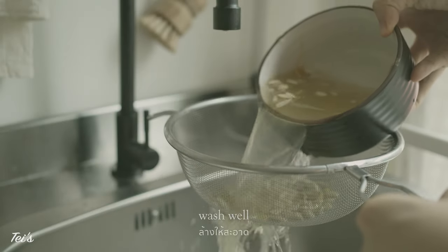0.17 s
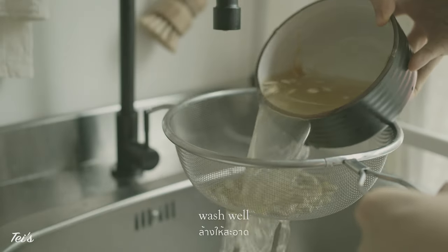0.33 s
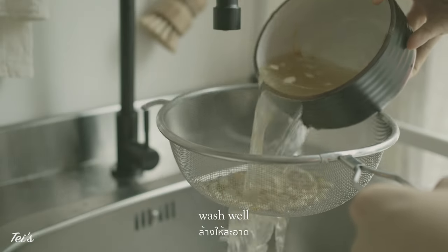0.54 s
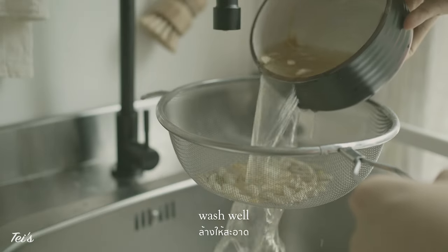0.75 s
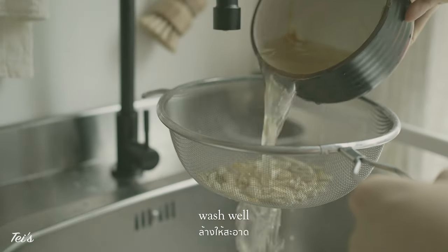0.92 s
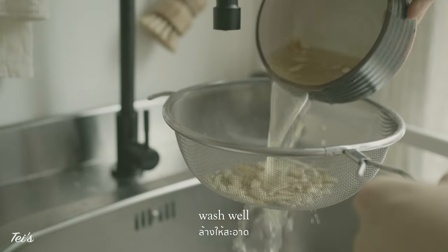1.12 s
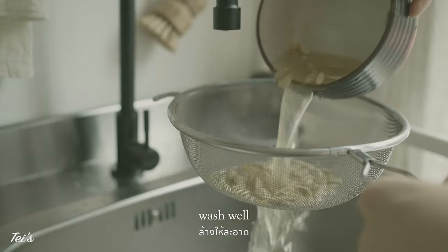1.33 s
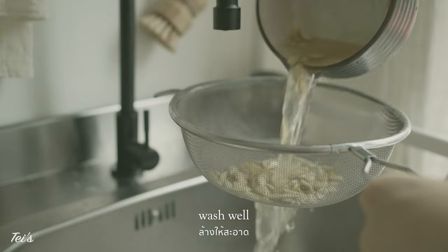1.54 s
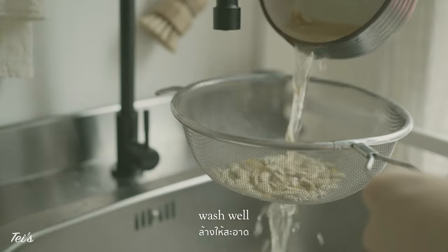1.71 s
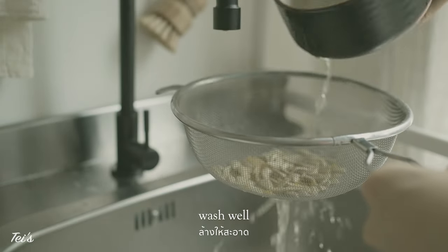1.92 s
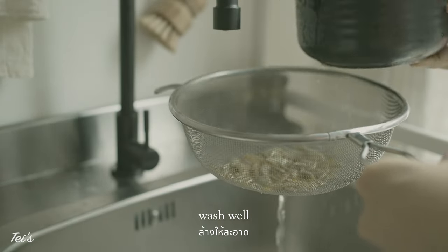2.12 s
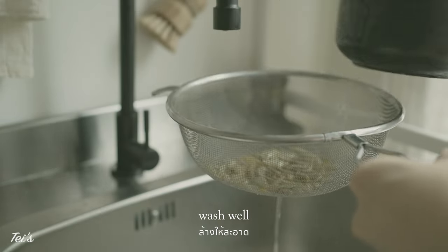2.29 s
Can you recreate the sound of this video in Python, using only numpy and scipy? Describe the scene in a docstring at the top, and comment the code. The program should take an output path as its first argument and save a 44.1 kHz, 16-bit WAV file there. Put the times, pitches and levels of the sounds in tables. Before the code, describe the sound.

Water pours through a mesh strainer into a steel sink, heard close in a small kitchen. Until about 0.8 s a dense, bubbly stream drums softly on the ringing steel. From 0.8 to 1.6 s it breaks into crackling spatters, dull slaps and bright bubble plips. It thins, with a hollow slap near 1.8 s and a plip cluster near 1.9, then sparse high drips until 2.3 s.

```python
"""Pouring water into a steel sink

Water is poured from a bowl through a mesh strainer into a steel kitchen sink. The full stream drums on
the steel (filtered random hits) and churns up bubbles (rising sine pings) and spray (droplet ticks).
As it thins it breaks into slaps, splashes (bursts of ticks) and loud single bubbles, and ends in drips.
The sink floor rings through resonators; dying noise echoes stand for the basin and a small kitchen."""
import sys
import numpy as np
from scipy import signal
from scipy.fft import rfft, irfft
from scipy.io import wavfile

SR = 44100
rng = np.random.default_rng(int(sys.argv[2]) if len(sys.argv) > 2 else 0)


def transcribe(signal):
    """Save signal, clipped to [-1, 1], as a 16-bit WAV file at the path in sys.argv[1]."""
    frames = np.atleast_2d(signal).T
    limited = np.clip(frames, -1, 1)
    pcm = np.round(limited * 32767).astype(np.int16)
    wavfile.write(sys.argv[1], SR, pcm)


N = 103987
TIME = np.arange(N) / SR

# The stream's bubbling and spray, before the colouring by size:
# (time [s], level of large bubbles [dB], level of small bubbles [dB], level of spray [dB])
CHURN_LEVELS = [(0,-30.5,-35.5,-42.5),(.18,-28,-33,-38),(.31,-31,-34.5,-39.5),(.39,-35,-41,-46),(.46,-38,-29,-38),(.54,-32.5,-31,-41),(.68,-33.5,-31,-40.5),(.76,-24,-35,-38.5),(.84,-35,-31,-36.5),(1.07,-30,-36,-36.5),(1.2,-36,-41,-43.5),(1.29,-25,-40,-48.5),(1.33,-29.5,-40.5,-42.5),(1.41,-34,-29,-31.5),(1.48,-42.5,-42,-49),(1.56,-30.5,-29,-45),(1.63,-30.5,-38.5,-48),(1.72,-33.5,-34.5,-44),(1.83,-34.5,-42.5,-71),(1.89,-22.5,-54,-90),(1.99,-43,-109.5,-98),(2.35,-100,-48,-87)]
# How strong each bubble size is: (pitch [Hz], level per pitch class [dB])
BUBBLE_SPECTRUM = [(800,-19),(1200,-12),(1650,-2.5),(2000,-8.5),(2600,-2.5),(4000,-1.5),(5500,-2),(7000,0.5),(10000,-8),(14500,-7)]
# The largest bubbles shrink as the stream thins: (time [s], lowest pitch [Hz])
LOWEST_PITCH = [(0, 750), (.85, 1040), (1.25, 1480), (2.3, 1880)]
# Tone of the droplet ticks: (frequency [Hz], relative level [dB])
SPRAY_SPECTRUM = [(500,-43.5),(1200,-35.5),(1900,-41),(5000,14),(12500,10),(16000,-48.5)]
# Loud single bubbles: (time [s], level [dB], pitch [Hz], cycles to the peak [count], left over right [dB])
LOUD_BUBBLES = [(.0005,-11.5,1465,3.75,-0.5),(0.195,-24,1470,8.2,-9),(0.355,-17,4270,4.5,-8),
                (0.5216,-12.5,3640,4.6,-1),(0.612,-10.5,2180,1.6,-5),(0.668,-16.5,2960,4.9,-10),(0.7196,-13.5,1653,5.2,-10),
                (0.895,-9.5,4850,3,-3),(1.026,-18,4100,3,12),(1.084,-11,3250,2.2,9),
                (1.1041,-13,4010,3.7,-2),(1.133,-17,4280,2.8,2),(1.137,-10.5,3670,2.5,4),(1.2467,-16.5,2750,3.1,-3),(1.3,-15.5,4350,1.9,4),
                (1.4393,-10.5,3680,2,0),(1.5127,-9,3490,2,2),
                (1.5357,-12.5,5870,4,-2),(1.5512,-15.5,2530,4,-6),(1.5938,-12,2210,3.3,-2),(1.633,-37.5,1130,6.6,-13),(1.66,-46,1060,5.6,-8.5),(1.6628,-21.5,3010,3.8,8.5),
                (1.869,-14,4550,2.4,5),(1.8825,-21.5,2160,10,-2),(1.9373,-23,2364,5.3,4),(1.958,-22.5,2210,5.5,1),
                (2.0377,-21.5,6500,4.2,-6),(2.0479,-18,5420,3,4),(2.167,-34,2066,13,-8),
                (2.209,-18.5,3190,3.8,-15.5),(2.2181,-26.5,2937,11.3,14),(2.22,-40,2980,53,-5.5),(2.2894,-21.5,3450,1.2,-3)]
# Bursts of droplets: (start [s], level [dB], time to the peak [s], centre [Hz])
SPLASH_BURSTS = [(0.074,-21,0.0044,3040),(0.133,-21.5,0.0089,2870),(0.297,-22,0.0044,4440),(.492,-17,0.0017,2870),(0.551,-18,0.0028,3480),(0.829,-24.5,0.0049,5970),(.878,-23.5,.003,5800),(0.963,-20.5,0.0034,4600),(1,-40,0.001,6500),(1.025,-17,0.0019,3570),(1.036,-16.5,0.0029,4500),
                 (1.261,-25.5,0.0053,7730),(1.301,-15.5,0.0013,7000),(1.356,-17.5,.002,7000),(1.376,-21,0.0015,7650),(1.398,-43,0.0039,5000),(1.416,-17,0.0018,6500),(1.494,-21.5,0.0049,8000),(1.593,-26.5,.004,2560),(1.601,-31.5,0.002,9000),(1.756,-33,0.0016,7900),(1.769,-28,0.0046,8250),(1.8476,-20,0.0016,6670),(1.865,-19.5,0.0017,4800),(1.95,-33.5,0.0045,12400),
                 (2.006,-37,0.006,9450),(2.027,-29.5,0.0033,9000),(2.046,-24.5,0.0013,5760),(2.102,-44,0.0013,9300),(2.111,-34,0.0016,6600),(2.177,-45.5,0.0065,8300),(2.2235,-30.5,0.0007,7220),(2.288,-27,0.0017,5200)]
# The unbroken stream drums on the steel: (time [s], level [dB])
DRUMMING_LEVEL = [(0,-42.5),(.15,-37.5),(.36,-37),(.48,-40.5),(.62,-37),(.73,-41),(.8,-47),(.9,-82)]
# Tone of hits on the steel: (frequency [Hz], relative level [dB])
DRUM_SPECTRUM = [(60,-42),(95,-29),(130,-12.5),(195,-18),(240,0.5),(480,-0.5),(690,0),(800,-4.5),(1200,-1),(1700,-17)]
# Gouts of water slap the steel: (start [s], level [dB], time to the peak [s], centre [Hz])
STEEL_SLAPS = [(0.828,-41.5,0.028,623),(0.96,-31.5,0.025,770),(1.0,-40.5,0.074,545.4),(1.106,-31,0.021,308),(1.212,-34.5,0.021,536),(1.346,-37,0.032,546),(1.374,-39,0.016,314),(1.411,-42.5,0.011,547),
               (1.503,-52,0.011,636),(1.563,-51.5,0.016,687),(1.648,-53.5,0.029,756),(1.769,-27.5,0.011,496),(1.838,-36.5,0.014,456),(1.952,-44.5,0.018,657),(2.006,-37.5,0.021,657.4),(2.056,-39.5,0.031,539),(2.088,-42.5,0.014,351)]
# The whole floor gives under a gout: (frequency [Hz], relative level [dB])
HEAVE_SPECTRUM = [(50,-29),(160,2),(400,-16)]
# The sink floor rings: (frequency [Hz], level [dB])
FLOOR_MODES = [(238,2),(288,3),(466,-3),(690,-1.5)]

# Bubbles
LARGE_HZ, SMALL_HZ, SPRAY_HZ = 1860, 4230, 8700  # pitches where each CHURN_LEVELS column rules alone
START_BUBBLES_PER_S, THINNING_S = 11000, 2
BUBBLES_DB, RISE_CYCLES, SIZE_SPREAD_DB = -0.5, 3.22, 2.2
PITCH_RISE = .012  # half the share by which the pitch rises per rise time
PATCHY_DB, PATCHES_PER_S = -1.5, 33  # bubbles of one size come in brief runs
BIRTH_SPLASH_DB = -2  # the splash that traps a loud bubble, for a bubble of one cycle
SHORTEST_RISE_S = .0008
WATER_LOW_CUT_HZ = 650
# Droplets
CLUMPS_PER_S, CLUMP_RISE_S, CLUMP_DEPTH = 120, 0.0019, 0.87
CLUMP_BUBBLE_SHARE = 0.34  # how far bubbles follow the showers, as a power
SPRAY_DB, TICKS_PER_S, TICK_SPREAD_DB = 3, 3300, 4
SPLASH_TICKS_PER_S, SPLASH_SPREAD_DB = 6000, 3.2
SPLASH_OCTAVES = 0.5  # to each side
PAN_SPREAD_DB, EAR_LAG_S = 4, .00007  # random spread between left and right
# Steel
SLAP_HITS_PER_S, SLAP_OCTAVES = 2200, 0.41  # octaves to each side
SLAP_SKIRT_DB, SKIRT_OCTAVES = -4.5, 0.86  # a wider, softer band around each slap
GULP_DB, SLAP_RING_DB, HEAVE_DB = -3, -5, -19.5
SINK_T60_S = .13  # time for the ringing to fall by 60 dB
# Echoes and air
BASIN_DB, BASIN_T60_S = -7, .04
ROOM_DB, ROOM_T60_S, FIRST_ECHO_S = -6, 0.14, 0.0022
LOW_ROOM_DB, STEEL_SIDE_DB, WIDE_ABOVE_HZ = -8, -3.5, 585
AIR_DB, CUTOFF_HZ = -99, 16200


def from_db(db):
    """Turn decibels into a gain."""
    return 10 ** (np.asarray(db) / 20)


def rms_one(x):
    """Scale to unit power."""
    return x / np.sqrt(np.mean(x ** 2) + 1e-20)


def in_time(rows):
    """Read each column of a table at every sample, on straight lines between its points."""
    s, *columns = np.transpose(rows)
    return [np.interp(TIME, s, column) for column in columns]


def at_hz(points, hz):
    """Read a spectrum on a log-frequency axis, where equal steps are equal musical intervals."""
    f, db = np.transpose(points)
    return np.interp(np.log(hz + 1e-9), np.log(f), db)


def coloured(x, points):
    """Shape a signal by a spectrum, then set it to unit power."""
    hz = np.arange(N + 1) * SR / (2 * N)
    shaped = rfft(x, 2 * N) * from_db(at_hz(points, hz))
    return rms_one(irfft(shaped)[..., :N])


def highpass(x, order, hz):
    """Take away the sound below a frequency."""
    return signal.sosfilt(signal.butter(order, hz, "high", fs=SR, output="sos"), x)


def band(x, hz, octaves):
    """Keep a steep band reaching some octaves to each side of a centre."""
    edges = [min(hz / 2 ** octaves, SR / 3), min(hz * 2 ** octaves, .45 * SR)]
    return signal.sosfilt(signal.butter(3, edges, "band", fs=SR, output="sos"), x + 1e-18)


def swell(u):
    """Rounded attack peaking at u = 1, then a decay."""
    u = np.maximum(u, 0)
    return (u * np.exp(1 - u)) ** 2


def panned(db):
    """Left and right gains for a level difference."""
    return from_db(np.array([db, -db]) / 2)


def air():
    """The kitchen's quiet air: very faint noise, weaker toward the treble."""
    noise = rng.standard_normal((2, N))
    return from_db(AIR_DB) * coloured(noise, [(40, -6.5), (10000, -15.5)])


def echoes(x, t60):
    """Dense dying reflections: fading noise, different at each ear and drawn anew at each call."""
    t = TIME[:SR // 4]
    response = rng.standard_normal((2, len(t))) * from_db(-60 * t / t60) * (t > FIRST_ECHO_S)
    response = response / np.linalg.norm(response, axis=1, keepdims=True)
    return signal.fftconvolve(x, response, axes=1)[:, :x.shape[1]]


def in_sink(x):
    """Direct sound, the basin's close reflections, and the kitchen's longer ones."""
    both = np.tile(x.sum(0) / np.sqrt(2), (2, 1))
    basin = from_db(BASIN_DB) * echoes(x, BASIN_T60_S)
    return x + basin + from_db(ROOM_DB) * echoes(both, ROOM_T60_S)


def impacts(per_s, spread_db):
    """Random stereo clicks, each with its own size and place; steady power at any rate."""
    at = np.flatnonzero(rng.random(N) < per_s / SR)
    size = rng.exponential(1, N)[at]
    sign = rng.choice([-1, 1], N)[at]
    pan = rng.standard_normal(N)[at]
    lag = rng.standard_normal(N)[at]
    rate = (per_s + 0 * TIME)[at]
    strength = sign * from_db(spread_db * np.minimum(size, 3)) / np.sqrt(rate)
    left, right = strength * panned(PAN_SPREAD_DB * pan)
    out = np.zeros((2, N))
    out[0, at] = left
    right_at = at + np.round(lag * EAR_LAG_S * SR).astype(int)
    out[1, np.clip(right_at, 0, N - 1)] = right
    return rms_one(out)


def chirp(u, cycles):
    """A bubble's tone creeps upward as it nears the surface; u counts rise times."""
    return np.sin(2 * np.pi * cycles * u * (1 + PITCH_RISE * u))


def floor_ringing(push):
    """The sink floor rings at its own pitches when pushed: one resonator for each."""
    r = from_db(-60 / (SINK_T60_S * SR))  # how much is left after one sample
    top = np.array([1, 0, -1]) * (1 - r * r) / 2
    ringing = 0
    for hz, db in FLOOR_MODES:
        bottom = [1, -2 * r * np.cos(2 * np.pi * hz / SR), r * r]
        ringing = ringing + from_db(db) * signal.lfilter(top, bottom, push)
    return ringing


def steel():
    """The stream, then separate gouts, beat on the sink floor and set it ringing; each gout gulps air."""
    hits = coloured(impacts(SLAP_HITS_PER_S, spread_db=2.5).mean(0), DRUM_SPECTRUM)
    stream = from_db(*in_time(DRUMMING_LEVEL)) * hits
    heave = from_db(HEAVE_DB) * coloured(rng.standard_normal(N), HEAVE_SPECTRUM)
    gouts = 0
    for s, db, rise, hz in STEEL_SLAPS:
        u = (TIME - s) / rise
        skirt = from_db(SLAP_SKIRT_DB) * rms_one(band(hits, hz, SKIRT_OCTAVES))
        thud = rms_one(rms_one(band(hits, hz, SLAP_OCTAVES)) + skirt)
        gulp = from_db(GULP_DB) * chirp(u, hz * rise)
        gouts = gouts + from_db(db) * swell(u) * (thud + heave + gulp)
    out = stream + gouts + floor_ringing(stream + from_db(SLAP_RING_DB) * gouts)
    shared, apart = echoes(np.array([out, out]), ROOM_T60_S)
    apart = highpass(apart, 2, WIDE_ABOVE_HZ)
    # opposite signs at the two ears widen the echo
    return out + from_db(LOW_ROOM_DB) * shared + from_db(STEEL_SIDE_DB) * np.array([apart, -apart])


def splashes():
    """Short showers of droplets: swelling bursts of ticks, each in its own band."""
    ticks = impacts(SPLASH_TICKS_PER_S, SPLASH_SPREAD_DB)
    out = 0
    for s, db, rise, hz in SPLASH_BURSTS:
        droplets = rms_one(band(ticks, hz, SPLASH_OCTAVES))
        out = out + from_db(db) * swell((TIME - s) / rise) * droplets
    return out


def bubble(hz, cycles, pan, splash):
    """A bubble swells within a few cycles, with a splash around its pitch, rings out and echoes."""
    u = TIME[:SR // 4] * hz / cycles
    wet = splash * rms_one(band(rng.standard_normal(len(u)), hz, SPLASH_OCTAVES))
    ping = highpass(swell(u) * (chirp(u, cycles) + wet), 4, .7 * hz)
    return in_sink(panned(pan)[:, None] * ping)


def plinks():
    """The loud single bubbles and last drips; even the briefest is a pip rather than a click."""
    out = np.zeros((2, N + SR))
    for s, db, hz, cycles, pan in LOUD_BUBBLES:
        cycles = max(cycles, hz * SHORTEST_RISE_S)
        ping = bubble(hz, cycles, pan, from_db(BIRTH_SPLASH_DB) / cycles)
        start = max(int(s * SR), 0)
        out[:, start:start + ping.shape[1]] += from_db(db) * ping
    return out[:, :N]


def clumps():
    """Droplets land in irregular little showers of limited size: a gain of unit power."""
    starts = (rng.random(N) < CLUMPS_PER_S / SR) * rng.exponential(1, N)
    showers = rms_one(signal.fftconvolve(starts, swell(TIME / CLUMP_RISE_S))[:N])
    limited = 2 * np.tanh(np.abs(showers) / 2)
    return rms_one(1 - CLUMP_DEPTH + CLUMP_DEPTH * limited)


def runs():
    """One size of bubble comes and goes: a random gain of unit power, gliding between points."""
    knots = rng.standard_normal(N // 100)
    place = TIME * PATCHES_PER_S + rng.random()
    drift = np.interp(place, np.arange(len(knots)), np.clip(knots, -2, 1))
    return rms_one(from_db(PATCHY_DB * drift))


def spray(fine, showers):
    """Fine droplets tick as they land, in the same showers that stir the bubbles."""
    ticks = coloured(impacts(TICKS_PER_S, TICK_SPREAD_DB), SPRAY_SPECTRUM)
    return in_sink(from_db(fine + SPRAY_DB) * showers * ticks)


def churn():
    """A cloud of bubbles, few large and many small, thinning with the flow, under a spray of droplets."""
    large, small, fine = in_time(CHURN_LEVELS)
    lowest, = in_time(LOWEST_PITCH)
    per_s = START_BUBBLES_PER_S * np.exp(-TIME / THINNING_S)
    showers = clumps()
    pitches = np.geomspace(800, 14500, 26)
    anchors = np.log([LARGE_HZ, SMALL_HZ, SPRAY_HZ])
    out = 0
    for hz in pitches:
        # blend the three level curves by how near this pitch is to each
        a, b, c = (np.interp(np.log(hz), anchors, weights) for weights in np.eye(3))
        level = a * large + b * small + c * fine + at_hz(BUBBLE_SPECTRUM, hz) + BUBBLES_DB
        gain = from_db(level) / (1 + (lowest / hz) ** 12)  # bubbles below the lowest pitch fade out
        births = impacts(per_s * hz / pitches.sum(), SIZE_SPREAD_DB)
        births = births * gain * runs() * showers ** CLUMP_BUBBLE_SHARE
        ping = bubble(hz, RISE_CYCLES, pan=0, splash=0)
        ping = ping / np.linalg.norm(ping, axis=1, keepdims=True)
        out = out + signal.fftconvolve(births, ping, axes=1)[:, :N]
    return out + spray(fine, showers)


def scene():
    """Bubbles, splashes and the steel, over the kitchen's quiet air."""
    water = highpass(churn() + plinks() + in_sink(splashes()), 5, WATER_LOW_CUT_HZ)
    return air() + steel() + water


def record(dry):
    """Cut the top of the treble steeply."""
    return signal.sosfilt(signal.ellip(10, .2, 80, CUTOFF_HZ, fs=SR, output="sos"), dry)


dry = scene()
out = record(dry)
transcribe(out)
```